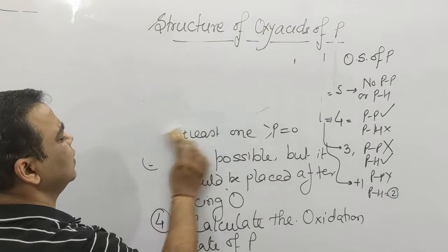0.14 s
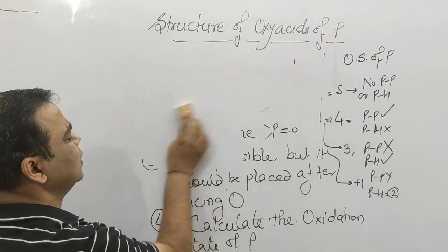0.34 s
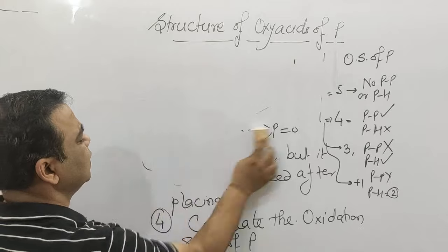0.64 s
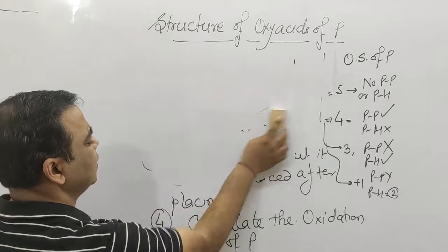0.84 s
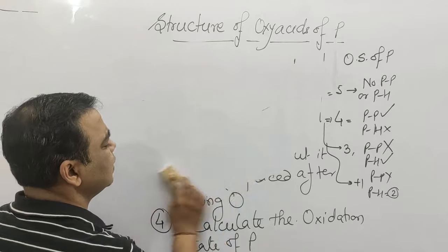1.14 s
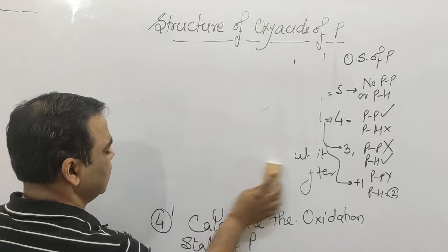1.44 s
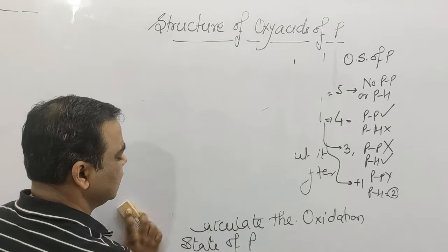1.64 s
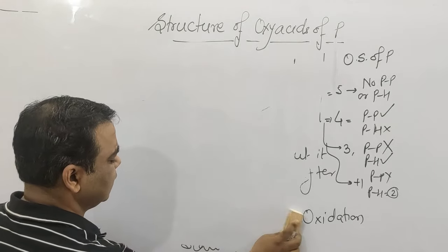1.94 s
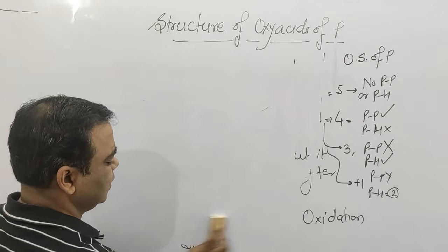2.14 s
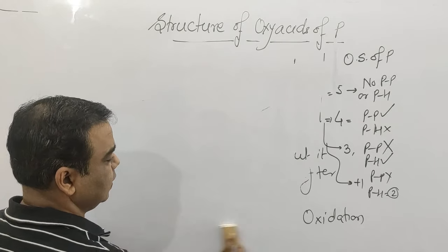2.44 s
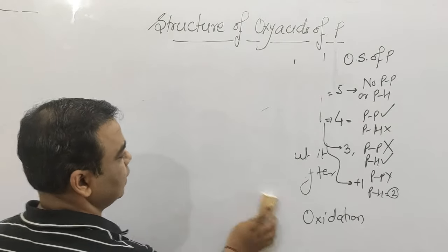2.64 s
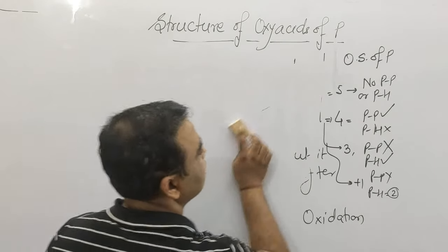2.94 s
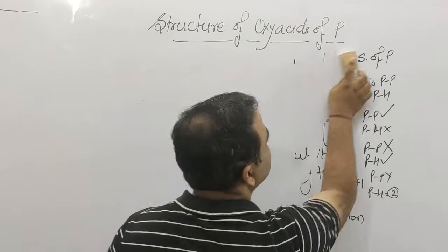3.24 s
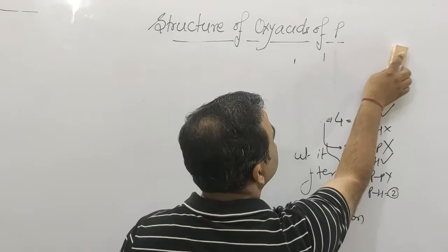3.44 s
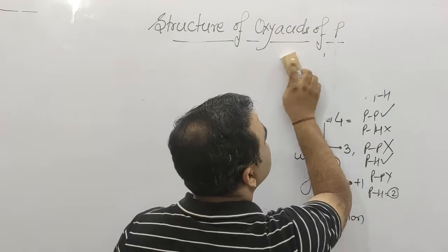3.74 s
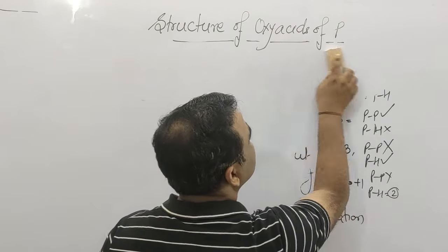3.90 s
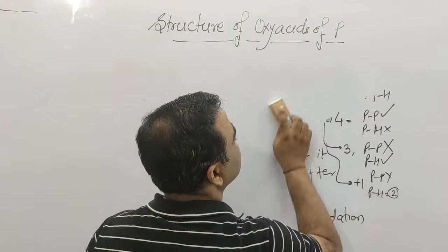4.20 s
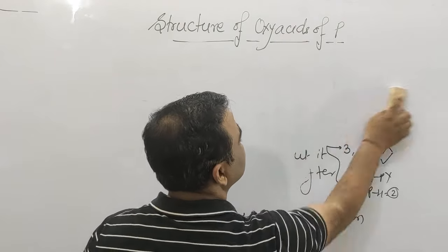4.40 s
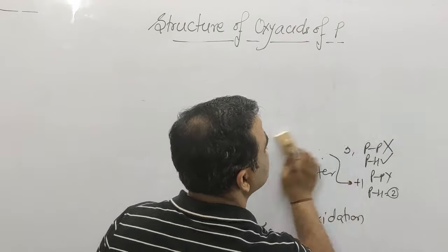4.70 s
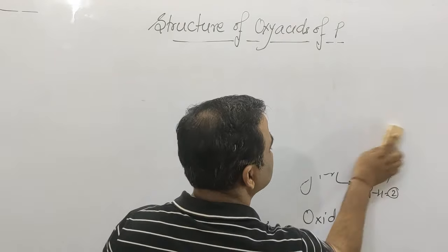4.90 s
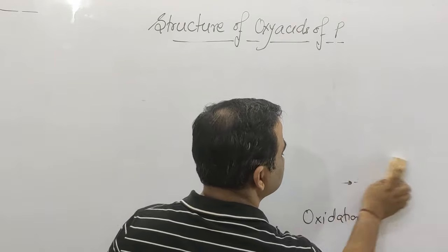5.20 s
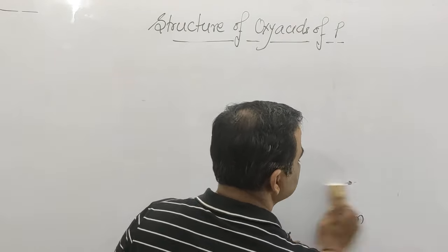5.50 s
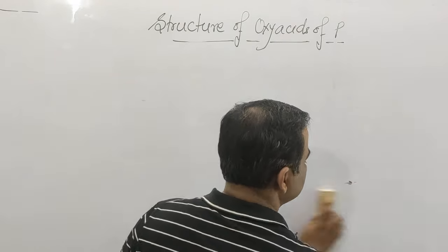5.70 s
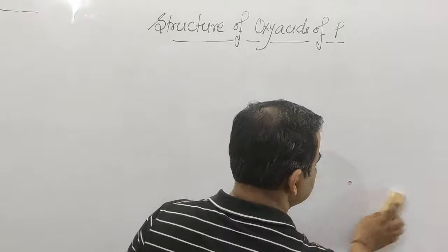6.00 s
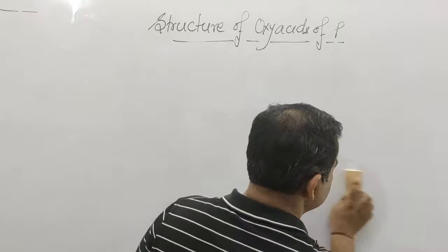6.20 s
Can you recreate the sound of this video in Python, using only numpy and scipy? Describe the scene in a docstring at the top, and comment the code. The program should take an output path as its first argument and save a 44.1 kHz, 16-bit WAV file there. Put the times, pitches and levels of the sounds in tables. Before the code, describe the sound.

Heard from a microphone near a classroom whiteboard, a felt eraser rubs rapidly to and fro, hissing and at times faintly squeaking while the panel drones. Its wooden edge clacks and its padded face thuds repeatedly early on, then comes a stretch of hollower wiping and several dull bumps near the end. The knocks ring briefly in the room over a low, steady fan hum.

```python
"""A classroom, one microphone near the whiteboard, a fan humming in the background.
A wooden duster with a felt pad is wiped to and fro: the felt hisses and the block rasps with each stroke,
at times singing briefly or running hollow, while the thin panel drones and sways under the arm.
Now and then the block rocks: its padded face thumps and its bare edge knocks on the board, which
thuds and booms. The room's reverberation follows the thumps and knocks."""
import sys
import numpy as np
from scipy import signal
from scipy.fft import rfft, irfft, next_fast_len
from scipy.io import wavfile
from scipy.ndimage import uniform_filter1d

SR = 44100
rng = np.random.default_rng(int(sys.argv[2]) if len(sys.argv) > 2 else 0)


def unload_audio(sound):
    """Save the sound as a 16-bit wav file, at the path given as the first command line argument."""
    columns = np.transpose(np.atleast_2d(sound))
    # keep every value between -1 and 1, then stretch to whole-number steps
    steps = np.round(np.clip(columns, -1, 1) * 32767)
    wavfile.write(sys.argv[1], SR, steps.astype(np.int16))


N = 280035
TIME = np.arange(N) / SR

# The panel's modes, damped by the pad. Each row: pitch in Hz, relative level in dB, t60 in seconds.
THUD_MODES = [(135, -7, .13), (168, -3, .17), (222, -4, .1), (262, -7, .07), (292, 0, .11), (315, -3, .08),
              (343, -.5, .12), (378, -4, .09), (485, -7.5, .08), (540, -6, .09), (615, -10, .09),
              (690, -17, .04)]
# The lowest, whole-panel modes. Each row: pitch in Hz, relative level in dB, t60 in seconds.
BOOM_MODES = [(41.2, 4, 0.45), (56.7, 3.5, 0.27), (76.3, 0, 0.47), (102.4, -7, 0.64), (170, -16, 0.98),
              (211, -6.5, 0.16)]
THUD_CONTACT_HZ, BOOM_CONTACT_HZ = 750, 240  # the panel gives way softly, so it sounds without a click


def from_db(db):
    """Decibels to gain."""
    return 10 ** (np.asarray(db) / 20)


def rms_one(x):
    """Scale to unit rms."""
    return x / np.sqrt(np.mean(x ** 2) + 1e-20)


def in_time(points):
    """Read a curve of (seconds, value) at every sample."""
    return np.interp(TIME, *np.transpose(points))


def at_hz(points, hz):
    """Read a curve of (Hz, value) on a log-frequency axis."""
    points_hz, values = np.transpose(points)
    return np.interp(np.log(hz + 1e-9), np.log(points_hz), values)


def drift(rate_hz):
    """Smooth random wavering of rms 1, mostly slower than rate_hz."""
    hop, settle = 40, 2000
    pole = np.exp(-2 * np.pi * rate_hz * hop / SR)
    white = rng.standard_normal(N // hop + settle + 2)
    slow = signal.lfilter([1], [1, -2 * pole, pole * pole], white)[settle:]
    return np.interp(np.arange(N) / hop, np.arange(len(slow)), rms_one(slow))


def filtered(x, spectrum):
    """Pass a signal through a curve of (Hz, gain in dB)."""
    size = next_fast_len(N)
    hz = np.fft.rfftfreq(size, 1 / SR)
    return irfft(rfft(x, size) * from_db(at_hz(spectrum, hz)), size)[:N]


def coloured_noise(spectrum):
    """Noise with the given spectral shape; rms 1."""
    return rms_one(filtered(rng.standard_normal(N), spectrum))


def band(x, low_hz, high_hz):
    """Second-order band-pass."""
    return signal.sosfilt(signal.butter(2, [low_hz, high_hz], "band", fs=SR, output="sos"), x)


def softened(x, hz):
    """Low-pass, the way a yielding contact takes the treble off a blow."""
    return signal.sosfilt(signal.butter(2, hz, fs=SR, output="sos"), x)


def blows(times, strength_db):
    """One impulse for each contact."""
    out = np.full(N, 1e-18)
    out[np.round(times * SR).astype(int)] = from_db(strength_db)
    return out


def strike(times, strength_db, modes, scatter_db=2.0):
    """Every contact sets the modes ringing; their shares vary at random, as with the spot that is hit."""
    shares = from_db(np.array(modes)[:, 1] + scatter_db * rng.standard_normal((len(times), len(modes))))
    shares = shares / np.sqrt(np.sum(shares ** 2, axis=1, keepdims=True))
    out = np.zeros(N)
    for share, (hz, _, t60) in zip(shares.T, modes):
        pole, angle = from_db(-60 / (t60 * SR)), 2 * np.pi * hz / SR
        force = blows(times, strength_db + 20 * np.log10(share))
        out += signal.lfilter([0, np.sin(angle)], [1, -2 * pole * np.cos(angle), pole * pole], force)
    return out


def fan():
    """In the background, a wavering hum of narrow noise bands over a steady rush of air."""
    # The fan's hum. Each row: centre in Hz, width in Hz, level in dB.
    hum_bands = [(46.41, 1.6, -38), (91.5, 4.6, -48), (160.3, 8, -51.5), (242, 5.6, -59.5), (289, 20, -73)]
    # The room's air. Each row: frequency in Hz, relative density in dB.
    air_spectrum = [(35, -0.5), (60, -3), (118, -4), (167, 0.5), (206, -7), (305, -13), (829, -25),
                    (3120, -39.5), (3670, -44.5), (6710, -35), (12300, -47.5), (15500, -60)]
    hum = 0
    for hz, width, db in hum_bands:
        note = band(rng.standard_normal(N), hz - width / 2, hz + width / 2)
        hum += from_db(db) * rms_one(note)
    return hum + from_db(-44) * coloured_noise(air_spectrum)


def wiping(last_stop_s=6.34, easing_per_s=3.05, grip_s=0.04):
    """The pad speeds up and slows once a stroke. Gives its relative speed and the strokes' four levels."""
    # The arm's strokes, each lasting until the next. Each row: start and fastest moment in seconds,
    # share of speed kept at the turn (little in a sharp reversal, much in a rounded loop),
    # then relative levels in dB of felt hiss, top of the hiss, block rasp and panel drone.
    strokes = [(-0.04, .10, 0.6, -53.5, -6, -55, -44.5), (.14, 0.283, 0.38, -48, -9, -54.5, -42.5),
               (.35, .46, 0.34, -56.5, -4, -60, -46), (.51, 0.707, 0.58, -54.5, -7, -55.5, -42),
               (0.888, 1.217, 0.1, -51, -8.5, -56, -44.5), (1.48, 1.725, 0.08, -50, -11.5, -54.5, -45),
               (1.758, 1.785, .1, -51.5, -10.5, -53, -45), (1.85, 1.92, .6, -51, -10.5, -53.5, -46),
               (2.097, 2.333, 0.1, -51.5, -11.5, -57, -51), (2.395, 2.463, 0.45, -54, -12, -54, -42),
               (2.69, 2.804, 0.35, -57, -11, -61, -47.5), (2.882, 3.022, 0.34, -53, -10, -57.5, -44.5),
               (3.087, 3.176, 0.8, -56, -3.5, -55, -47), (3.354, 3.44, 0.48, -62, 0, -54.5, -48),
               (3.51, 3.645, 0.25, -61.5, 0, -57.5, -49.5), (3.857, 3.975, 0.22, -60.5, -5, -58, -47.5),
               (4.104, 4.304, 0.22, -59, -2, -58, -47.5), (4.345, 4.423, 0.4, -55, -3, -53.5, -45),
               (4.53, 4.65, 0.32, -54, -3.5, -53, -44.5), (4.80, 4.87, 0.35, -54, -4.5, -53, -46.5),
               (4.998, 5.135, 0.12, -52, -8.5, -55, -44), (5.172, 5.24, .08, -51, -7.5, -51, -45),
               (5.36, 5.495, 0.07, -49.5, -10, -55, -43), (5.54, 5.58, .16, -49.5, -9, -50.5, -42),
               (5.715, 5.845, 0.09, -51, -9.5, -53, -43.5), (5.888, 5.935, 0.4, -52, -6.5, -55, -44),
               (6.075, 6.186, 0.17, -50, -6, -54.5, -44.5), (6.305, 6.37, 0.4, -58, -4, -53, -43.5)]
    start, fastest, kept, *levels = np.transpose(strokes)
    stroke = np.maximum(np.searchsorted(start, TIME) - 1, 0)
    length_s = np.diff(start, append=last_stop_s)[stroke]
    marks = np.sort(np.concatenate([start, fastest, [last_stop_s]]))
    half_strokes = np.interp(TIME, marks, np.arange(len(marks)))
    swing = np.abs(np.sin(half_strokes * np.pi / 2))
    nearest_turn = np.minimum(np.round(half_strokes / 2).astype(int), len(kept) - 1)
    slowest = kept[nearest_turn]
    easing = .5 + easing_per_s * length_s  # a longer stroke leaves its turn more gently
    speed = slowest + (1 - slowest) * swing ** easing
    # the hand takes grip_s to change its pressure and tilt
    return [speed] + [uniform_filter1d(level[stroke], size=int(grip_s * SR)) for level in levels]


def felt(hiss_db, top_db, rasp_db):
    """Countless fibres slip and hiss; the block rasps above them; both judder as the pad drags."""
    # The felt's hiss. Each row: frequency in Hz, relative density in dB.
    hiss_spectrum = [(500, 3), (900, 0.5), (1400, -0.5), (2000, -2), (2500, -3), (3200, -4), (4000, -2),
                     (5600, 0.5), (6600, -2), (8000, -4), (10500, -5.5), (13000, -8.5), (15500, -17)]
    # The block's rasp. Each row: frequency in Hz, relative density in dB.
    rasp_spectrum = [(300, -32), (700, -5), (1100, -1.5), (1550, -1.5), (2000, -1), (2550, -1.5),
                     (3100, -3), (3700, -3), (4400, -7), (6000, -9), (15000, -49)]
    edges = np.geomspace(600, 16000, 21)
    white = rng.standard_normal((2, N))  # neighbouring bands take different noise
    hiss, power = 0, 0
    for k, (low, high) in enumerate(zip(edges, edges[1:])):
        hz = np.sqrt(low * high)
        fibres = from_db(at_hz(hiss_spectrum, hz)) * band(white[k % 2], low, high)
        power += np.mean(fibres ** 2)
        # the top opens and closes with the stroke, and the colour wanders as the pad travels
        opening_db = at_hz([(6500, 0.23), (11500, 0.84)], hz) * (top_db + 5)
        hiss += fibres * from_db(opening_db + drift(rate_hz=13))
    hiss = hiss / np.sqrt(power) * from_db(hiss_db + 1.5)
    rasp = coloured_noise(rasp_spectrum) * from_db(rasp_db - 1.5)
    flutter_db, judder_db = .7 * drift(rate_hz=25), .7 * drift(rate_hz=180)
    return (hiss + rasp) * from_db(flutter_db + judder_db)


def panel(drone_db):
    """The thin panel drones under the pad and sways under the arm's push."""
    # The depth of the sway. Each row: time in seconds, relative level in dB.
    sway_levels = [(0, -28), (.32, -25), (.62, -32), (.76, -28), (1.0, -30), (1.28, -25), (1.45, -26.5),
                   (2.15, -30), (2.3, -26.5), (2.78, -35.5), (2.99, -22), (3.13, -34.5), (3.42, -28),
                   (3.9, -31.5), (4.4, -32), (4.58, -26.5), (5.22, -20), (6.35, -23.5)]
    # The panel's slow flexing. Each row: frequency in Hz, relative density in dB.
    sway_spectrum = [(5, 2), (15, 14.5), (25, -2.5), (34, -5), (44, -2.5), (60, -12.5), (85, -24.5),
                     (115, -30), (200, -31), (400, -71)]
    # The rubbed panel's drone. Each row: frequency in Hz, relative density in dB.
    drone_spectrum = [(70, -34), (120, 6.5), (170, -1.5), (218, -6), (248, 4.5), (285, 3), (316, -1),
                      (342, 5.5), (376, -4.5), (408, -2), (460, -6), (540, -6.5), (650, -10.5),
                      (900, -20.5), (2000, -73)]
    sway = coloured_noise(sway_spectrum)
    sway = sway / np.sqrt(uniform_filter1d(sway ** 2, size=SR // 7))  # even out the chance swells
    unevenness = from_db(1.4 * drift(rate_hz=16))
    drone = coloured_noise(drone_spectrum) * unevenness
    return from_db(in_time(sway_levels) + 3.5) * sway + from_db(drone_db - 2.5) * drone


def thumps(bounce_t60_s=.085, slap_band_hz=(480, 1370)):
    """The padded face drops flat: a slap, a round note as it bounces on its felt, the panel's answer."""
    # Landings of the padded face. Each row: start in seconds, bounce level in dB, bounce pitch in Hz,
    # then levels in dB of panel boom, panel thud and slap. All levels are relative.
    landings = [(.166, -45, 285, -19, -41, -45), (.4964, -27, 280, -36, -36, -38),
                (.558, -25, 284, -36, -34.5, -36.5), (1.1888, -24, 284, -28, -36, -35.5),
                (1.716, -29.5, 276, -36, -45, -61), (1.7555, -24, 284, -23, -36, -38.5),
                (1.881, -26, 300, -40, -39, -42), (2.431, -26.5, 272, -33, -40, -41.5),
                (4.311, -42, 240, -40, -42, -61), (4.973, -27.5, 290, -29, -35, -62),
                (5.347, -30.5, 344, -31, -35, -58), (5.6247, -27.5, 252, -31, -31.5, -40),
                (5.7138, -32, 344, -19, -31.5, -58)]
    start, bounce_db, bounce_hz, boom_db, thud_db, slap_db = np.transpose(landings)
    bounce = sum(strike(start[[k]] + .001, bounce_db[k], [(hz, 0, bounce_t60_s)])
                 for k, hz in enumerate(bounce_hz))
    slap = blows(start, slap_db + 34)
    slap = band(band(slap, *slap_band_hz), *slap_band_hz)  # felt lets no treble through
    thud = strike(start, thud_db, THUD_MODES)
    tap = softened(bounce + thud, THUD_CONTACT_HZ) + slap
    boom = softened(strike(start, boom_db, BOOM_MODES), BOOM_CONTACT_HZ)
    return tap + boom + classroom(from_db(-8) * tap)


def classroom(x, build_s=.008):
    """What the walls send back to the microphone: a diffuse tail that lingers longest near 8 kHz."""
    # The room's decay. Each row: frequency in Hz, t60 in seconds.
    decay_times = [(150, 0.72), (400, 0.58), (1000, 0.55), (3000, 0.81), (8000, 1), (15000, 0.7)]
    t = TIME[:SR]
    edges = np.geomspace(60, 16000, 9)
    tail = 0
    for low, high in zip(edges, edges[1:]):
        t60 = at_hz(decay_times, np.sqrt(low * high))
        tail += band(rng.standard_normal(len(t)), low, high) * from_db(-60 * t / t60)
    tail *= 1 - np.exp(-t / build_s)
    return signal.fftconvolve(x, tail / np.sqrt(np.sum(tail ** 2)))[:N]


def chatter(times, strength_db, spectrum, decay_s):
    """Hard wood chatters for a few milliseconds as it lands."""
    envelope = signal.lfilter([1], [1, -np.exp(-1 / (decay_s * SR))], blows(times, strength_db))
    return coloured_noise(spectrum) * envelope


def knocks(valley_hz=780, valley_width_hz=160, valley_depth=.6):
    """The block tips onto its edge: a click, a woody clack and a rebound; the panel thuds and booms."""
    # Bare wood landing on the board. Each row: start in seconds, then relative levels in dB of
    # panel boom, panel thud, block ring, wood chatter and edge click.
    landings = [(0.2951, -20, -29.5, -32.5, -36, -57), (0.438, -25, -33, -42, -41.5, -60),
                (0.6039, -22, -32, -32.5, -35, -61), (0.711, -20, -29, -31, -35, -68),
                (1.1682, -18, -28, -43, -41, -41.5), (1.26, -15.5, -26.5, -30.5, -32, -52),
                (1.9333, -17.5, -27, -31.5, -35, -58), (2.199, -24, -36, -46, -43, -43.5),
                (2.2469, -14, -24, -34.5, -29.5, -34.5), (2.2908, -12, -22, -27.5, -31.5, -48),
                (2.4287, -32, -37, -43, -43, -44.5), (2.5373, -20, -27.5, -30, -34, -56),
                (2.855, -42, -50, -52, -54, -58), (4.78, -36, -44, -44, -60, -68),
                (5.176, -38, -42, -50, -49, -58)]
    # The block pressed on the board. Each row: mode in Hz, relative level in dB, t60 in seconds.
    block_modes = [(897, 0, .06), (965, 3, .07), (1095, -6, .04), (1162, -5.5, .055), (1250, -5.5, .035),
                   (1320, -3.5, .035), (1410, -5, .03), (1510, -10, .025), (1695, -6, .03)]
    # Its hard edge. Each row: mode in Hz, relative level in dB, t60 in seconds.
    edge_modes = [(720, -1, .03), (1943, -3, .04), (2143, 0, .045), (2390, -2, .035), (2595, -1, .03),
                  (3000, -5, .025), (3450, -6, .025), (3950, -5, .025), (4400, -7, .025), (5120, -6, .025),
                  (5890, -9, .02)]
    # The block's dull chatter. Each row: frequency in Hz, relative density in dB.
    clack_spectrum = [(200, 7), (450, 3), (680, -7), (830, -9), (945, 9), (1080, 2), (1400, 4), (1750, -3),
                      (2300, -21), (6000, -60)]
    # The edge's bright crack. Each row: frequency in Hz, relative density in dB.
    click_spectrum = [(300, -14), (1000, -3), (1900, 0), (2900, 1), (5000, -4.5), (7500, -15), (10000, -27),
                      (15000, -45)]
    start, boom_db, thud_db, ring_db, chatter_db, click_db = np.transpose(landings)
    thud = softened(strike(start + .004, thud_db + .5, THUD_MODES), THUD_CONTACT_HZ)
    boom = softened(strike(start + .0043, boom_db - .5, BOOM_MODES), BOOM_CONTACT_HZ)
    rebound = start + rng.uniform(.004, .008, len(start))
    ring = strike(start, ring_db, block_modes) + strike(rebound, ring_db - 12, block_modes)
    ring = softened(ring, hz=2100)  # the felt dulls the block's ring
    clack = ring + chatter(start, chatter_db, clack_spectrum, decay_s=.013)
    # the clack is hollow between the panel's notes and the block's
    valley = signal.iirpeak(valley_hz, valley_hz / valley_width_hz, fs=SR)
    clack -= valley_depth * signal.lfilter(*valley, clack)
    click = strike(start, click_db + 2.5, edge_modes)
    click += chatter(start, click_db + 3, click_spectrum, decay_s=.011)
    wood = softened(clack + click, hz=7200)  # wood yields a little
    echo = classroom(from_db(-2) * thud + from_db(-4.5) * wood)
    return thud + boom + wood + echo


def singing_pad():
    """At some angles the rubbing gathers in one resonance, which may slide as the pad travels."""
    # Brief sung notes. Each row: middle in seconds, spread to either side in seconds, pitch in Hz,
    # bandwidth in Hz, glide in Hz per second, level at the middle in dB.
    notes = [(1.136, 0.026, 5870, 700, 0, -59), (1.691, 0.043, 5580, 650, 2002, -56),
             (1.794, 0.012, 4400, 1000, 0, -52), (1.805, 0.031, 2380, 500, 0, -56.5),
             (1.926, 0.033, 2460, 300, 0, -59), (1.97, 0.058, 5950, 700, 0, -60),
             (3.064, 0.08, 1543, 300, 2, -53), (3.03, 0.047, 3460, 600, 1500, -53.5),
             (3.446, 0.015, 2200, 1400, 0, -58), (3.967, .031, 4230, 400, -3, -63),
             (4.416, 0.052, 2510, 280, 0, -59.5), (4.419, 0.06, 5240, 600, -1500, -59.5),
             (4.614, 0.042, 2565, 520, 800, -55), (4.622, .06, 4900, 700, -2500, -57.5),
             (4.73, .022, 2880, 2200, 0, -56), (4.89, 0.037, 3890, 350, 0, -61),
             (5.131, 0.018, 2080, 150, 2000, -53.5), (5.125, 0.027, 4890, 2400, 0, -53),
             (5.165, .04, 315, 89.5, 900, -45), (5.476, .035, 393, 141, 0, -45.5),
             (5.668, .03, 249, 80, 0, -42.5), (5.499, 0.023, 2040, 480, 0, -55),
             (5.498, 0.022, 5340, 2000, 0, -51), (5.846, 0.029, 1690, 700, 0, -58),
             (6.167, 0.047, 2430, 300, 0, -55.5), (6.18, 0.038, 3660, 1000, 0, -51.5),
             (6.184, 0.025, 5800, 800, 0, -51.5)]
    out = np.zeros(N)
    for middle, spread, hz, width, glide, db in notes:
        near = np.abs(TIME - middle) < 4 * spread
        t = TIME[near] - middle
        grain = softened(rng.standard_normal((2, SR)), width / 2)[:, -len(t):]
        phase = 2 * np.pi * (hz * t + glide * t ** 2 / 2)
        swell = np.exp(-.5 * (t / spread) ** 2)
        note = swell * (grain[0] * np.cos(phase) + grain[1] * np.sin(phase))
        out[near] += from_db(db) * note * np.sqrt(np.sum(swell ** 2) / np.sum(note ** 2))
    return out


def tilted_pad(rub):
    """Tilted on the high strokes, the pad runs hollow: its rubbing takes on a row of peaks and dips."""
    # The hollow colour. Each row: frequency in Hz, gain in dB.
    hollow_colour = [(1050, -2), (1600, 2), (2120, -4.5), (2520, 2), (3100, 1.5), (3660, -5), (4100, 1),
                     (4600, -2), (5150, .5), (6200, -2), (7500, 1), (9000, 0)]
    # How hollow the pad runs. Each row: time in seconds, share from 0 to 1.
    hollowness = [(3.15, 0), (3.35, .7), (4.05, 1), (4.45, .85), (4.92, .7), (5.08, .15)]
    share = in_time(hollowness)
    return (1 - share) * rub + share * filtered(rub, hollow_colour)


def scene():
    """Duster, board and fan at one microphone; hiss, rasp and drone each grow with the pad's speed."""
    speed, hiss_db, top_db, rasp_db, drone_db = wiping()
    speed_db = 20 * np.log10(speed)
    rub = felt(hiss_db + .56 * speed_db, top_db + .5 * (1 - speed), rasp_db + .49 * speed_db)
    pad = tilted_pad(rub) + singing_pad()
    board = knocks() + thumps() + panel(drone_db + .19 * speed_db)
    return (pad + board + fan())[None]


def record(dry):
    """The microphone's signal is cut steeply above 15.75 kHz."""
    return signal.sosfilt(signal.ellip(12, .1, 90, 15750, fs=SR, output="sos"), dry)


dry = scene()
out = record(dry)
unload_audio(out)
```